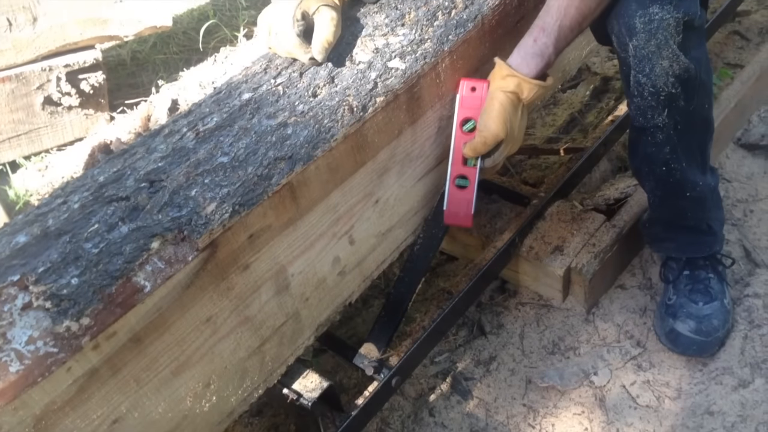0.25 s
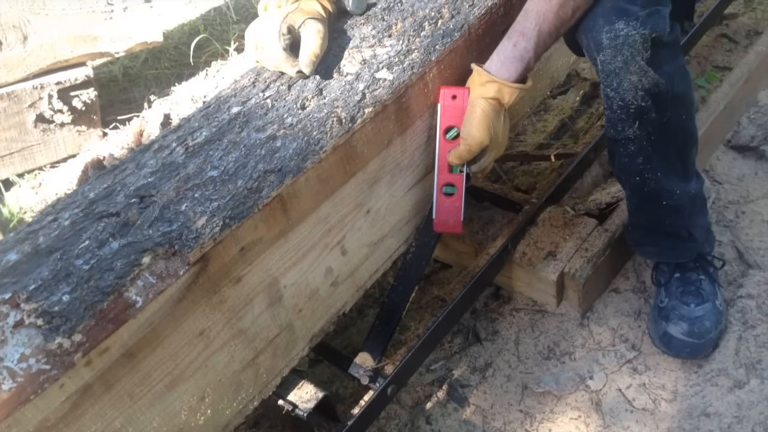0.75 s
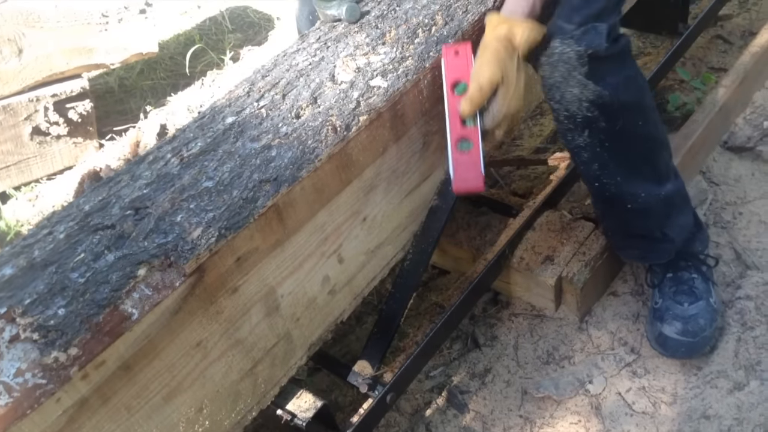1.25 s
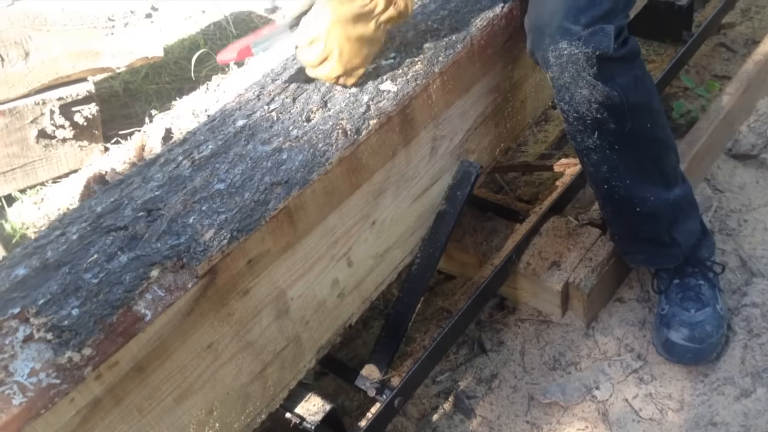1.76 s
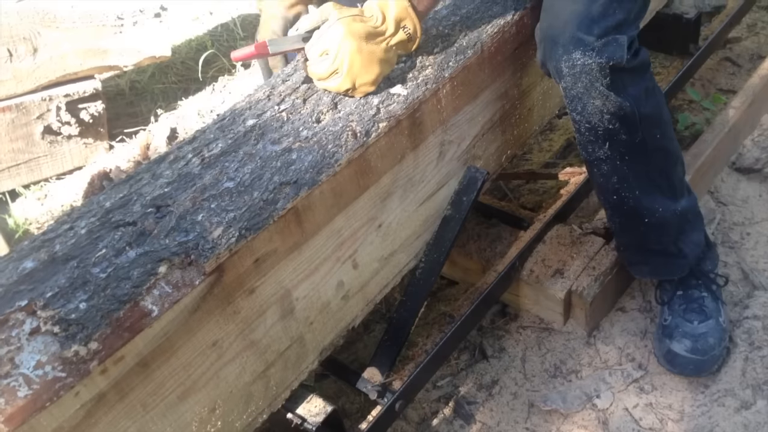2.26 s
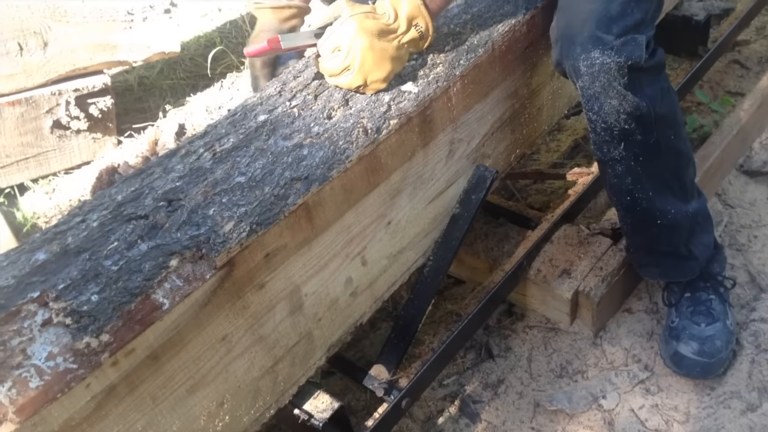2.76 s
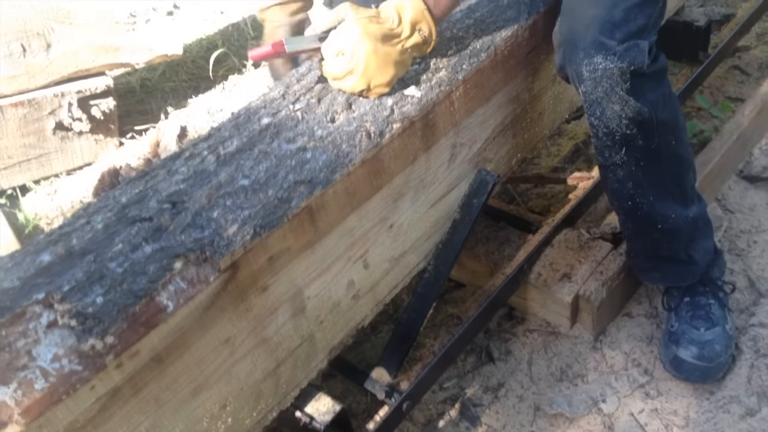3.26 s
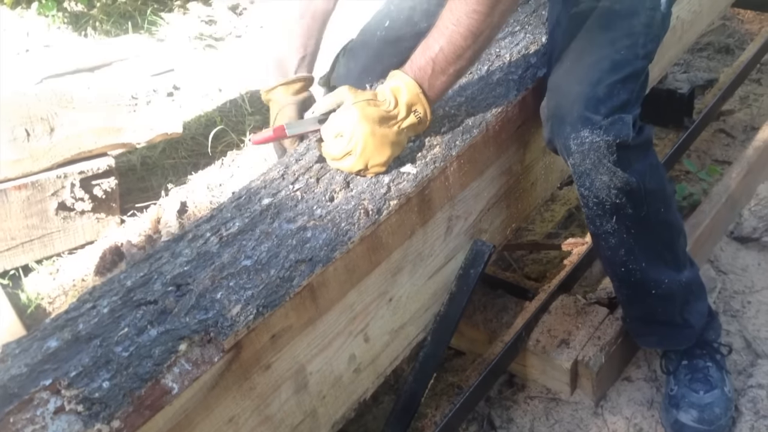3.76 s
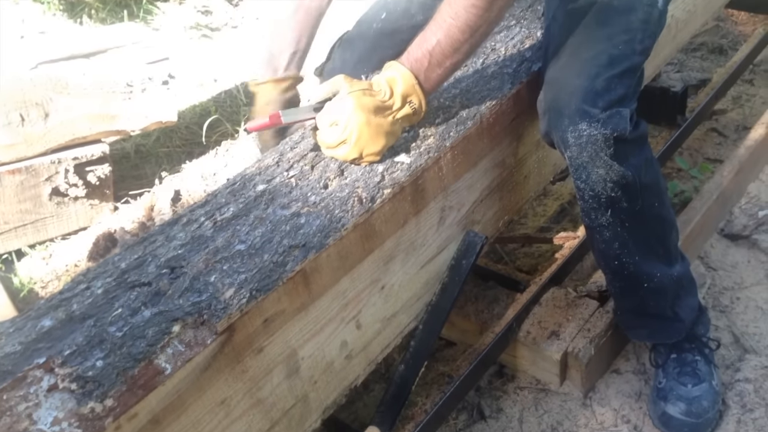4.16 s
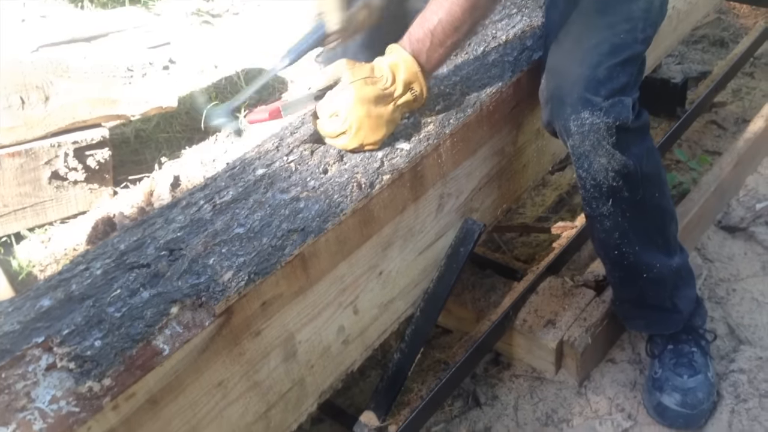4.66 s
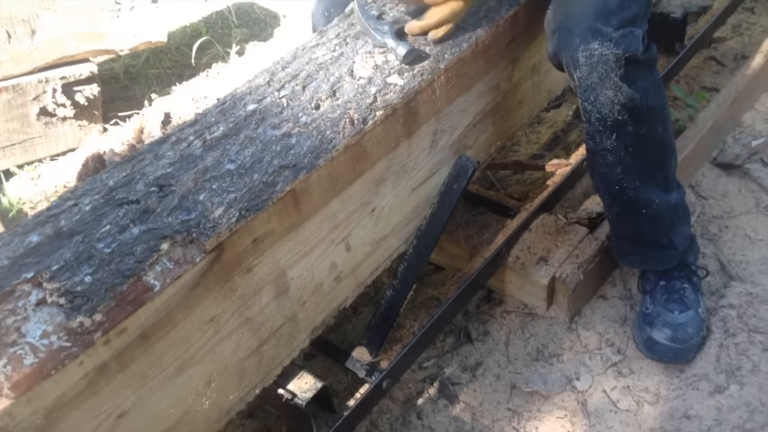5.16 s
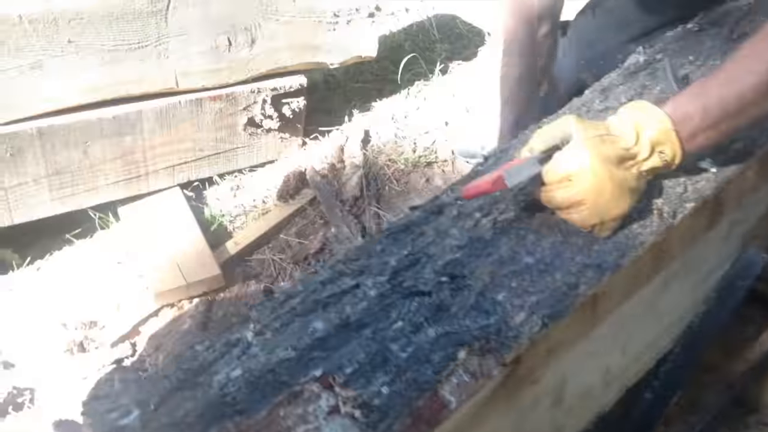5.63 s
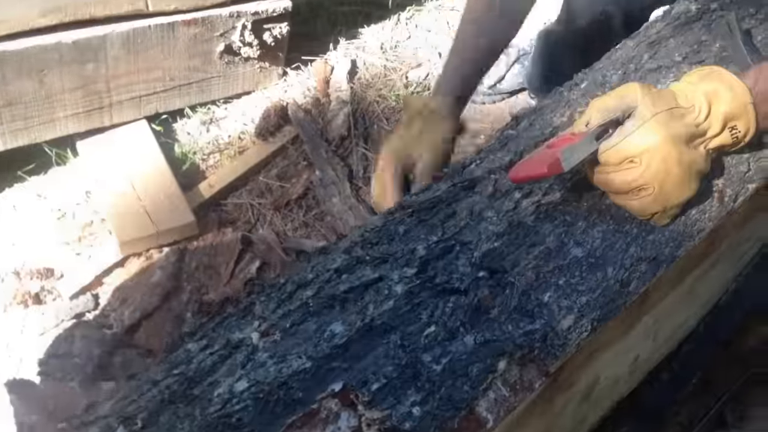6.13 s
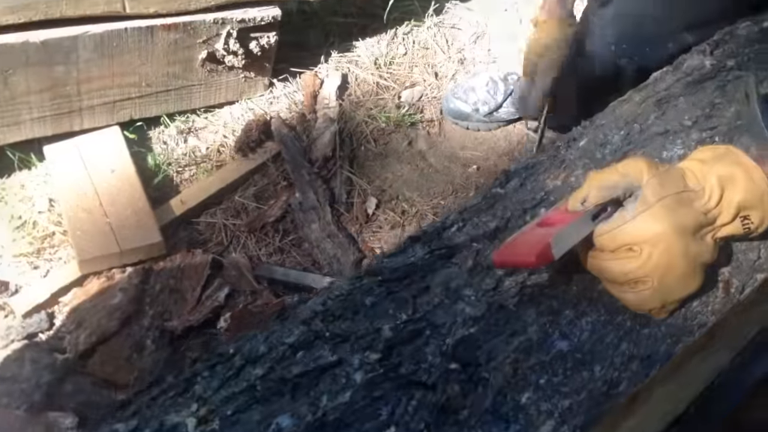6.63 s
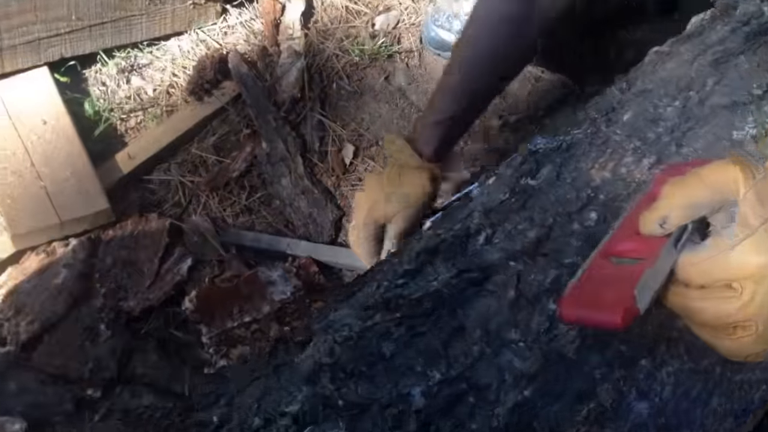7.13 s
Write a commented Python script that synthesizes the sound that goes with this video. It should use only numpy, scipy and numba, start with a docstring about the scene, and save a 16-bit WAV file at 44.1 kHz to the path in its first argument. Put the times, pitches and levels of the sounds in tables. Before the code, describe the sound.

Quiet open air, a thin hiss over wavering low rumble, heard close above a log outdoors. At 0.05 s there is a soft bump and faint bird slurs; a woody tick at 0.4, then a steel tool clinks down with a quick bounce around 0.6. Birds whistle near 1.1 and 1.6-2.0 amid faint glove rubs and light knocks. At 2.3 and 2.45 a hammer taps a steel clamp dully, the second with a tiny rebound. Four hard blows follow at 2.9, 3.35, 3.8 and 4.3: bright, noisy clanks with short metallic ring, some with a high ping, over a long bed hum. The background ducks under them and creeps back. From 4.9 to 7 s, hollow log bumps, sharp wooden ticks at 5.75, 5.9 and 6.4, and gritty bark scrapes mingle with more frequent slurred whistles, thinning to quiet air.

```python
"""Outdoors at a sawmill, a small bird whistles, tools knock on the log and one clinks down on the steel bed.
Then a hammer drives a steel log clamp tight: two dull taps, the second with a rebound, then four hard blows.
Each contact excites the clamp's noise-like chatter, its ringing modes, the log's knock and the bed's long hum.
Damped knocks and gloves rubbing on bark follow, with more slurred whistles, over filtered-noise open air.
The microphone's gain ducks under loud sounds and recovers slowly."""
import sys
import numpy as np
from scipy import signal
from scipy.fft import rfft, irfft
from scipy.io import wavfile
from scipy.ndimage import uniform_filter1d
from numba import njit

SR = 44100
rng = np.random.default_rng(int(sys.argv[2]) if len(sys.argv) > 2 else 0)


def file_out(sig):
    """Save sig as 16-bit WAV at sys.argv[1]."""
    # one column per channel
    cols = np.atleast_2d(sig).T
    # limit, then scale
    lim = np.clip(cols, -1, 1)
    pcm = np.round(lim * 32767).astype(np.int16)
    wavfile.write(sys.argv[1], SR, pcm)


N = 325899
TIME = np.arange(2 * SR) / SR  # seconds since a contact

# Hammer on clamp, the second tap followed by its rebound:
# (time [s], strength [dB], treble [dB], log knock [dB], lower head ping [dB], upper head ping [dB])
HAMMER_BLOWS = [(2.3208, 0.5, -14.5, 4.5, 0.5, -15), (2.438, -3, -16.5, 6, -1, -21),
                (2.4640, -8, -21, 3, -3.5, -17), (2.9160, 4.5, -1.5, -2.5, -2.5, -3),
                (3.3650, 6, 1, 1.5, 8, 7.5), (3.8222, 6, 0.5, 0.5, -2, -5), (4.2868, 6, 0.5, 1, -3.5, 11.5)]
# Ringing modes of the clamp: (frequency [Hz], level [dB], t60 [s])
CLAMP_MODES = [(588, -46, .4), (685, -51, .55), (1040, -39, .16), (1134, -40, .38), (1366, -46, .36),
               (1569, -43, .33), (1642, -40, .2), (1985, -28, .11), (2080, -44, .33), (2466, -39, .38),
               (2978, -35, .15), (3176, -37, .23), (3535, -41, .32), (3750, -45, .29), (3885, -33, .15),
               (4102, -38, .18), (4497, -33, .14), (4643, -33, .16), (4890, -44, .25), (5443, -35, .17),
               (5760, -39, .24), (5809, -41, .22), (6198, -33, .2), (6601, -43, .19), (6868, -41, .22),
               (7030, -37, .16), (10495, -45, .17), (10950, -45, .14)]
# Modes of the mill's long steel bed: (frequency [Hz], level [dB], t60 [s])
BED_MODES = [(110, -62, 2.2), (267, -64, 1.8), (321, -60, 1.4), (345, -50, 1.8), (352, -57, 1.3),
             (385, -60, 1.2), (402, -58, 1.5), (539, -57, 1.3), (565, -50, 1.45), (590, -61, 1.2),
             (631, -63, 1.2), (730, -59, 1.2), (761, -62, 1.1), (1128, -60, 1.0), (1217, -52, 1.1),
             (1224, -58, 1.0), (2198, -64, 1.0)]
# Modes of the log knocked through the clamp: (frequency [Hz], level [dB], t60 [s])
LOG_MODES = [(50, -46, .06), (110, -42.5, 0.24), (203, -42.5, 0.33), (400.6, -32, 0.15), (436, -31, 0.092),
             (493, -36.5, 0.025), (554, -40.5, 0.15), (1150, -39, .25)]
# Modes of the hammer head, lower and upper: (frequency [Hz], level [dB], t60 [s])
HEAD_MODES = [(9798, -45, .3), (13893, -43, .31)]
# Dense vibration of clamp, log and bed:
# (frequency [Hz], clank level [dB], rattle level [dB], rattle t60 [s], bed wash level [dB])
DENSE_VIBRATION = [(40, -51.5, -66, 0.55, -88.5), (110, -35.5, -48.5, 0.7, -67),
                   (220, -35.5, -40.5, 0.37, -59), (430, -28, -33, 0.35, -53.5), (824, -34, -40, .28, -60),
                   (1410, -26, -31, .29, -61), (2530, -20, -29.5, 0.32, -61.5),
                   (3800, -13, -25, .27, -63.5), (6100, -20.5, -22.5, 0.14, -80),
                   (10200, -22, -24.5, 0.15, -92), (15300, -31, -36.5, 0.11, -99)]
# A steel tool set down against the bed: (time [s], level [dB])
TOOL_CLINKS = [(0.5918, -1.5), (0.5973, -3.5), (0.6301, -5.5)]
# Modes of that tool and the bed under it: (frequency [Hz], level [dB], t60 [s])
TOOL_MODES = [(322, -56, .45), (345, -56, .9), (590, -66, .4), (1560, -62, .2), (2196, -80, 1.2),
              (2433, -80, 1.0), (3537, -50, .18), (3880, -52, .16), (4021, -57, .27), (5184, -57, .16),
              (5346, -59, .16), (6428, -57, .12)]
# Hands and tools bumping the log: (time [s], level [dB])
LOG_BUMPS = [(0.055, -11.5), (4.947, -4), (5.206, 0), (5.590, -5.5), (5.734, -1.5), (6.094, -6.5),
             (6.35, -6), (6.55, -2.5)]
# The log's hollow answer to a bump: (frequency [Hz], level [dB], width [octaves], t60 [s])
HOLLOW_BANDS = [(194.8, -55, .06, 0.51), (386, -60, .25, 0.24)]
# Spirit level and tools knocking and ticking on wood: (time [s], level [dB], centre [Hz], t60 [s])
WOOD_KNOCKS = [(0.053, -60, 1100, .09), (0.377, -58, 1490, 0.066), (0.571, -50, 7000, 0.014),
               (1.396, -62, 2010, 0.075), (1.877, -53, 1770, 0.041), (4.871, -48.5, 3020, 0.026),
               (4.940, -53.5, 4500, 0.078), (5.760, -46.5, 790, 0.045), (5.855, -60.5, 402, .1),
               (5.9066, -42, 3040, 0.012), (5.919, -57, 994, .11), (6.371, -43.5, 4960, 0.016),
               (6.566, -51, 500, 0.11), (6.886, -63, 915, 0.059)]
# A knocked piece that rings on near one pitch: (time [s], level [dB], centre [Hz], t60 [s])
RINGING_KNOCKS = [(0.379, -60.5, 405, 0.2), (6.576, -55.5, 237, 0.56)]
# Gloves and level rubbing on bark: (time [s], length [s], level [dB], centre [Hz])
BARK_RUBS = [(1.153, 0.38, -76.5, 5130), (1.54, 0.15, -68.5, 2050), (1.943, 0.24, -67.5, 1880),
             (4.979, 0.28, -65.5, 2520), (5.323, 0.16, -69.5, 1810), (5.658, 0.37, -69.5, 3460),
             (6.28, 0.13, -66.5, 7100), (6.695, 0.095, -63.5, 1580), (6.95, 0.21, -74, 1178)]
# Bird phrases, each one slur repeated evenly:
# (time [s], notes [count], spacing [s], mid-note pitch [Hz], sweep [octaves], level [dB])
BIRD_PHRASES = [(0.078, 3, 0.13, 5900, -0.31, -75), (1.087, 3, .198, 4920, -0.33, -69.5),
                (1.62, 2, 0.11, 4030, 0.28, -72), (1.835, 2, 0.12, 5100, -0.54, -70),
                (4.205, 1, .2, 5180, .15, -68.5), (4.56, 2, .195, 5230, .1, -68),
                (5.365, 2, 0.2, 4580, -.25, -65), (5.505, 3, 0.2, 3960, .2, -67.5),
                (5.765, 2, .35, 5140, 0.2, -61.5), (6.15, 1, .2, 3900, -0.53, -68),
                (6.27, 2, 0.13, 4490, 0.089, -66.5), (6.3, 1, .2, 5300, 0.16, -66),
                (6.555, 2, .11, 4770, -0.65, -66.5), (6.685, 3, 0.13, 5890, -.3, -72)]
# Spectrum shape of the open air: (frequency [Hz], relative level [dB])
AIR_SPECTRUM = [(20, -22.5), (45, -6), (70, -0.5), (100, -5.5), (200, -2), (310, -6), (450, -12),
                (1000, -15), (2200, -16.5), (5000, -14), (9000, -19.5), (15000, -20)]

BODY_DB, RING_DB, HUM_DB = 2.06, 1.0, -0.2  # in every blow: middle range, clamp ring, bed hum
KNOCK_OCTAVES, RINGING_OCTAVES = 1.17, .11  # band widths of damped and of ringing knocks
CATCH_S = .006  # how long a glove sticks on one ridge of bark
NOTE_S, NOTE_EASE = .066, 1.5  # length of a slur; how strongly its glide levels off
AIR_DB = -67.5  # rms of the air noise before it wavers
TOP_HZ = 15300


def hammer(rise_s=.0022):
    """Repeated excitation of one structure: each blow damps the earlier ring the more, the harder it lands."""
    out = np.zeros(N)
    steel = weak_modes()
    attack = 1 - np.exp(-(TIME / rise_s) ** 2)
    for s, db, treble_db, knock_db, *ping_db in HAMMER_BLOWS:
        clamp = undb(RING_DB) * ring(CLAMP_MODES, BODY_DB, treble_db, scatter_db=2.5)
        log = undb(knock_db) * ring(LOG_MODES, BODY_DB, treble_db)
        bed = undb(HUM_DB) * ring(BED_MODES, BODY_DB, treble_db)
        head = sum(undb(ping) * ring([mode]) for ping, mode in zip(ping_db, HEAD_MODES))
        remaining = max(1 - undb(db), 0)
        out = out * np.interp(np.arange(N) / SR, [s, s + .03], [1, remaining])
        blow = clank(steel, BODY_DB, treble_db) + clamp + log + bed + head
        add(out, s, undb(db) * attack * blow)
    return out


def clank(steel, body_db, treble_db, chatter_s=0.0044, clank_t60=.045, wash_t60=1.8, grit_db=-10):
    """High modal density: the clamp chatters in its seat, rattles in faint modes and leaves a wash in the bed."""
    mode_hz, strength = steel
    phases = np.exp(2j * np.pi * rng.random(len(mode_hz)))
    struck = strength * undb(2 * rng.standard_normal(len(mode_hz))) * phases
    # Each faint mode is one line of a spectrum, so one inverse transform sounds them all.
    lines = np.zeros(len(TIME) // 2 + 1, complex)
    lines[(mode_hz * len(TIME) / SR).astype(int)] = struck
    tones = irfft(lines)
    chatter = rng.standard_normal(len(TIME))
    # The burst holds for chatter_s, then dies fast.
    burst = np.minimum(1, fade(clank_t60) * np.exp(np.log(1000) * chatter_s / clank_t60))
    body_hz, *columns = np.transpose(DENSE_VIBRATION)
    out = 0
    for hz in np.geomspace(40, 14500, 18):  # about half an octave apart
        clank_db, rattle_db, t60, wash_db = (np.interp(np.log(hz), np.log(body_hz), c) for c in columns)
        rattle = undb(rattle_db) * fade(t60)
        wash = undb(wash_db) * fade(wash_t60)
        noisy = (undb(clank_db) * burst + undb(grit_db) * rattle) * band(chatter, hz, 1 / 4)
        ringing = np.hypot(rattle, wash) * band(tones, hz, 1 / 4)
        out = out + undb(contact_db(hz, body_db, treble_db)) * (noisy + ringing) / 2
    return out


def weak_modes(count=300, peaks=70, peaks_db=4):
    """Modal distribution: many faint steel modes, wider apart towards the top, in strong and weak groups."""
    place = (np.arange(count) + rng.random(count)) / count
    hz = 30 + 5000 * place + 10500 * place ** 3
    grouping = np.interp(place, np.linspace(0, 1, peaks), rng.standard_normal(peaks))
    groups_db = peaks_db * np.sqrt(place) * grouping
    return hz, undb(groups_db + 3 * rng.standard_normal(count))


def ring(modes, body_db=0, treble_db=0, scatter_db=1, rise_cycles=0.6):
    """Modal superposition: decaying sines swell over some cycles, weighted anew by where each blow lands."""
    out = 0
    for hz, db, t60 in modes:
        gain = undb(db + contact_db(hz, body_db, treble_db) + scatter_db * rng.standard_normal())
        swell = 1 - np.exp(-TIME * hz / rise_cycles)
        out = out + gain * swell * fade(t60) * np.sin(2 * np.pi * (hz * TIME + rng.random()))
    return np.sqrt(2) * out


def contact_db(hz, body_db, treble_db):
    """Contact spectrum: a glancing blow knocks in the middle, feeds highs less and hardly shakes the log."""
    corners_hz = [120, 400, 1100, 2300, 6000]
    return np.interp(np.log(hz), np.log(corners_hz), [treble_db / 2, body_db, body_db, 0, treble_db])


def tool(scrape_db=-46, scrape_hz=4600, scrape_t60=0.19, wood_db=-55, wood_hz=1200):
    """Repeated impact: a steel tool lands and bounces, each contact giving a noise burst and short modal ring."""
    out = np.zeros(N)
    for s, db in TOOL_CLINKS:
        noise = rng.standard_normal(len(TIME))
        scrape = undb(scrape_db) * band(noise, scrape_hz, octaves=0.86)
        wood = undb(wood_db) * band(noise, wood_hz, octaves=2.2)
        add(out, s, undb(db) * ((scrape + wood) * fade(scrape_t60) + ring(TOOL_MODES, rise_cycles=5.8)))
    return out


def handling(grit_db=3.5):
    """Damped impact and stick-slip friction: bumps, knocks and ticks, and the gritty scrape of gloves on bark."""
    out = np.zeros(N)
    for s, db in LOG_BUMPS:
        add(out, s, sum(knock(db + mode_db, hz, octaves, t60) for hz, mode_db, octaves, t60 in HOLLOW_BANDS))
    for s, db, hz, t60 in WOOD_KNOCKS:
        add(out, s, knock(db, hz, KNOCK_OCTAVES, t60))
    for s, db, hz, t60 in RINGING_KNOCKS:
        add(out, s, knock(db, hz, RINGING_OCTAVES, t60))
    for s, length, db, hz in BARK_RUBS:
        # Each catch on the bark holds one random level.
        catches = undb(grit_db * rng.standard_normal(len(TIME)))[(TIME / CATCH_S).astype(int)]
        grains = band(catches * rng.standard_normal(len(TIME)), hz, octaves=1.32)
        stroke = np.sqrt(np.abs(np.sin(np.pi * np.minimum(TIME / length, 1))))
        add(out, s, undb(db) * stroke * grains)
    return out


def knock(db, hz, octaves, t60, rise_cycles=0.19):
    """Damped resonance: a decaying noise band, whose onset is slower the lower its centre frequency."""
    attack = 1 - np.exp(-TIME * hz / rise_cycles)
    return undb(db) * attack * fade(t60) * band(rng.standard_normal(len(TIME)), hz, octaves)


def bird(direct_db=-4, trees_db=-3.0, trees_t60=0.37, scatter=0.027):
    """Frequency glide and multiple scattering: whistles glide fast, level off and are smeared by the trees."""
    out = np.zeros(N)
    u = np.linspace(0, 1, int(NOTE_S * SR))  # progress through a note
    glide = .5 ** NOTE_EASE - (1 - u) ** NOTE_EASE
    for s, count, spacing, pitch_hz, sweep, db in BIRD_PHRASES:
        for k in range(round(count)):
            hz = pitch_hz * (1 + scatter * rng.standard_normal()) * 2 ** (sweep * glide)
            whistle = np.sqrt(2) * np.sin(np.pi * u) * np.sin(2 * np.pi * np.cumsum(hz) / SR)
            add(out, s + k * spacing, undb(db) * whistle)
    trees = rng.standard_normal(len(TIME)) * fade(trees_t60)
    scattered = signal.fftconvolve(out, trees / np.linalg.norm(trees))[:N]
    return undb(direct_db) * out + undb(trees_db) * scattered


def air(rumble_hz=400):
    """Broadband noise: quiet open air as a nearly even hiss over a faster, more strongly wavering low rumble."""
    noise = undb(AIR_DB) * unit(colour(rng.standard_normal(N), *np.transpose(AIR_SPECTRUM)))
    low = lowpass(noise, rumble_hz)
    hiss = noise - low
    return hiss * undb(.5 * walk(1.0)) + low * undb(2 * walk(13))


def undb(db):
    """Logarithmic level: decibels to amplitude gain."""
    return 10 ** (np.asarray(db) / 20)


def unit(x):
    """Normalisation: scale to rms 1."""
    return x / np.sqrt(np.mean(x ** 2))


def fade(t60):
    """Exponential decay: the level falls by 60 dB in t60 seconds."""
    return np.exp(-np.log(1000) * TIME / t60)


def add(out, s, x):
    """Superposition: mix x into out from time s."""
    i = max(int(s * SR), 0)
    out[i:i + len(x)] += x[:N - i]


def colour(x, hz, db):
    """Spectral weighting: filter by a curve drawn on a log-frequency axis."""
    f = np.maximum(np.fft.rfftfreq(len(x), 1 / SR), 1)
    return irfft(rfft(x) * undb(np.interp(np.log(f), np.log(hz), db)), len(x))


def band(x, hz, octaves):
    """Band limiting: a bell on the octave axis over a pink tilt, at rms 1."""
    f = np.maximum(np.fft.rfftfreq(len(x), 1 / SR), 1)
    bell = np.exp(-.5 * (np.log2(f / hz) / octaves) ** 2)
    return unit(irfft(rfft(x) * bell / np.sqrt(f), len(x)))


def lowpass(x, hz):
    """Low-pass filtering: a gentle second-order slope."""
    return signal.sosfilt(signal.butter(2, min(hz, SR / 3), fs=SR, output="sos"), x)


def walk(rate):
    """Slow fluctuation: straight lines between random values, rate of them a second, spread near 1."""
    steps = rng.standard_normal(1024)
    return np.interp(np.arange(N) / SR * rate, np.arange(len(steps)), steps)


@njit
def peak_hold(x, release):
    """Envelope detection: follows peaks at once and lets go slowly."""
    out, e = np.empty(len(x)), 0.
    for i in range(len(x)):
        e = max(abs(x[i]), e * release)
        out[i] = e
    return out


def scene():
    """Superposition of all sources at one microphone above the log."""
    return (hammer() + tool() + handling() + bird() + air())[None]


def record(dry, knee_db=-25, slope=.3, release_s=.33):
    """Dynamic compression: gain ducks under peaks above the knee and creeps back; a low-pass cuts the top."""
    peaks = uniform_filter1d(peak_hold(dry[0], np.exp(-1 / (release_s * SR))), size=128)
    gain = np.maximum(peaks / undb(knee_db), 1) ** -slope
    return signal.sosfilt(signal.ellip(10, .2, 70, TOP_HZ, fs=SR, output="sos"), dry * gain)


dry = scene()
out = record(dry)
file_out(out)
```